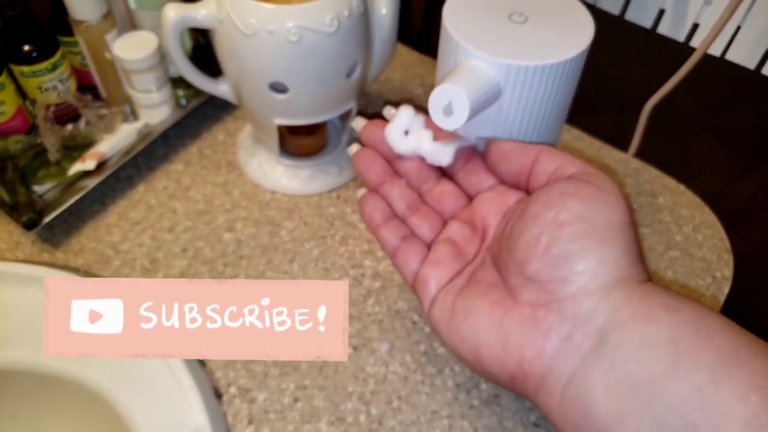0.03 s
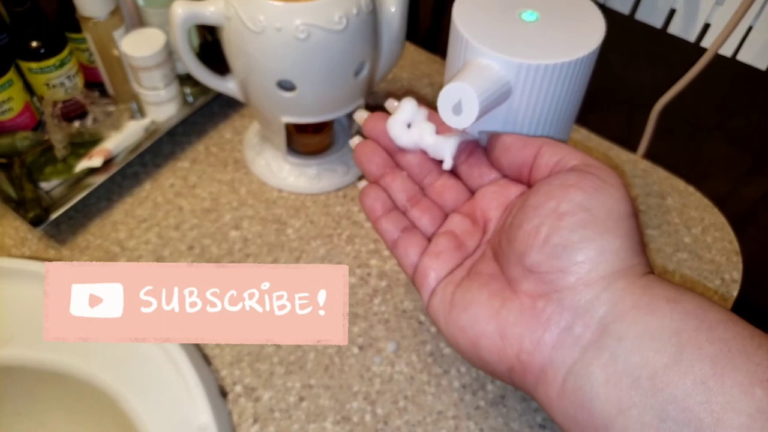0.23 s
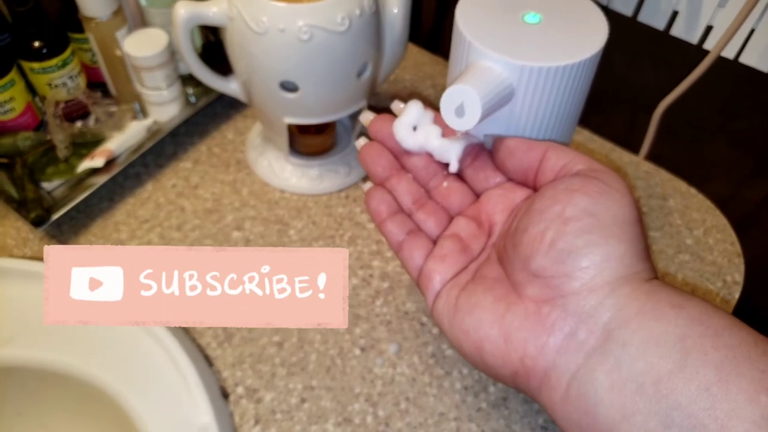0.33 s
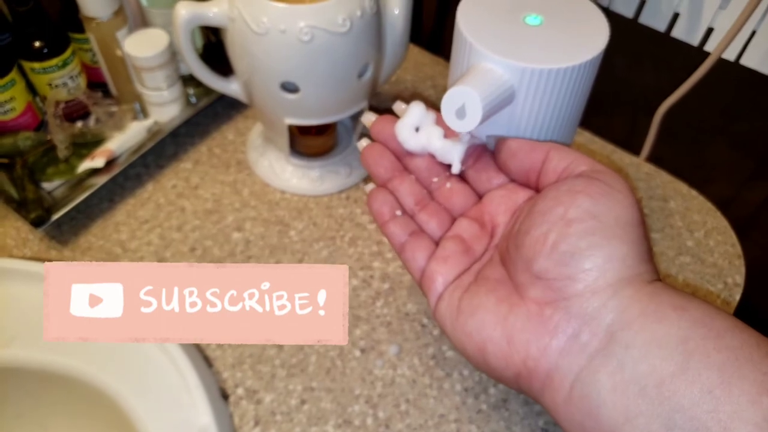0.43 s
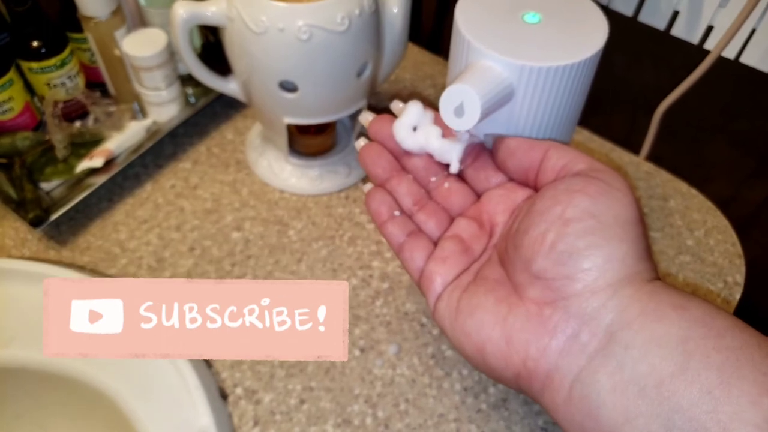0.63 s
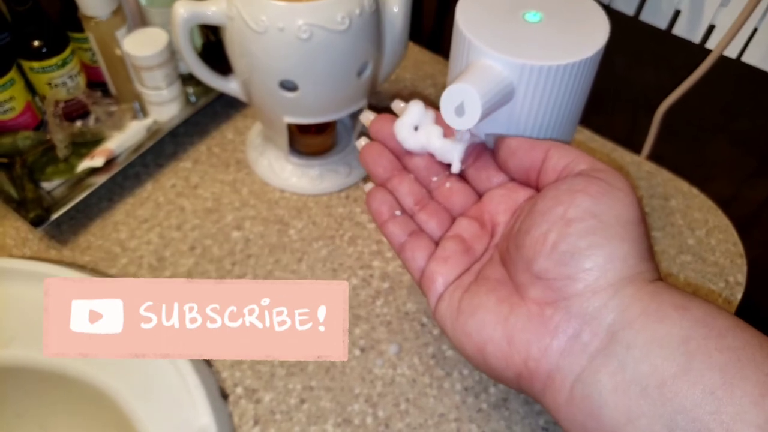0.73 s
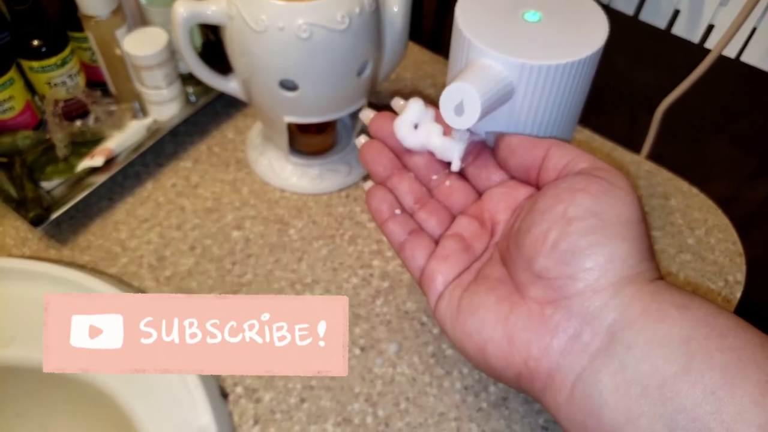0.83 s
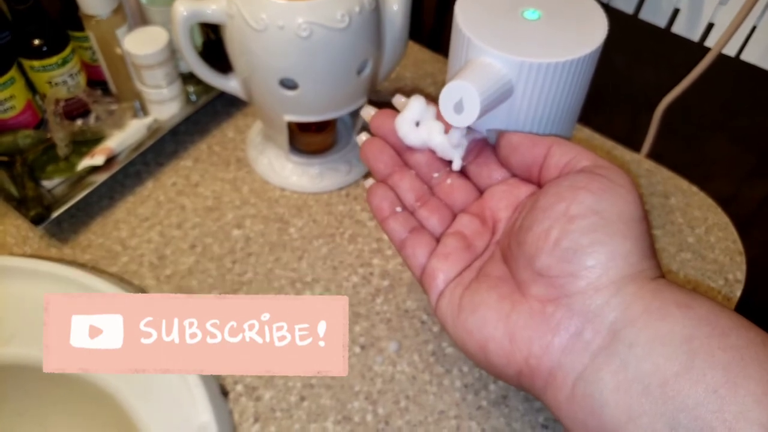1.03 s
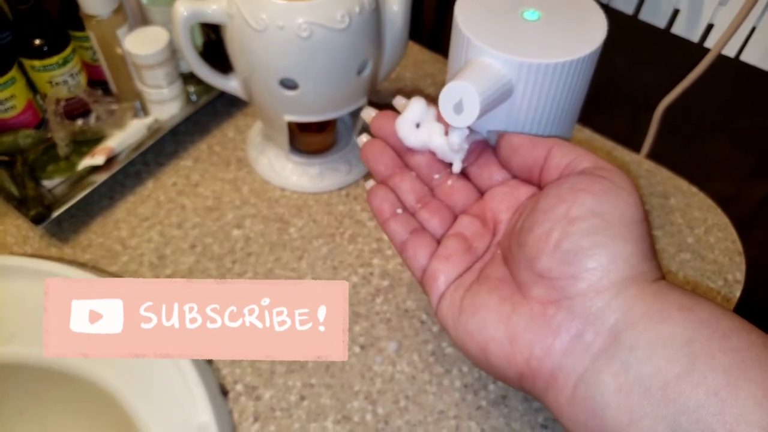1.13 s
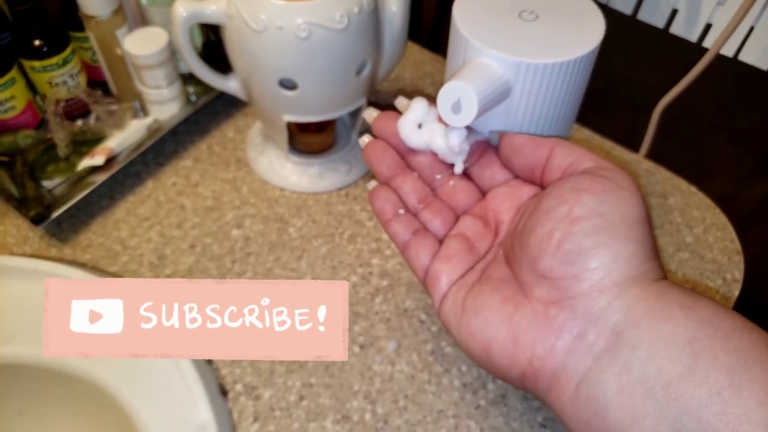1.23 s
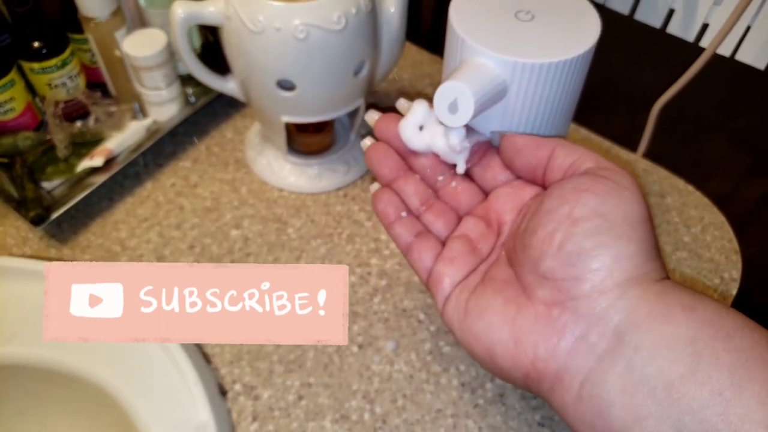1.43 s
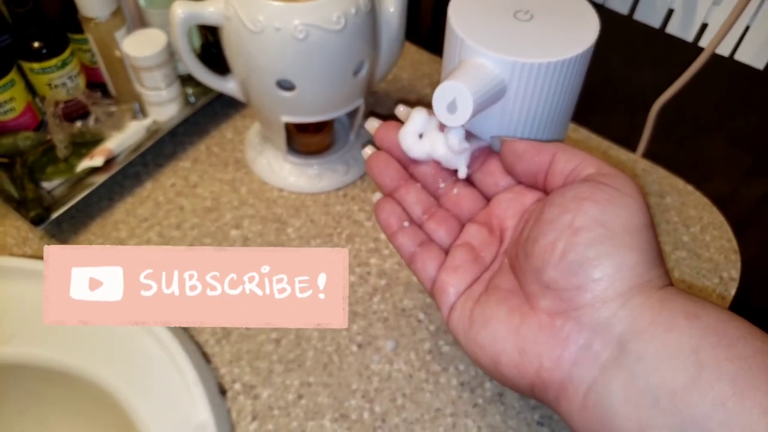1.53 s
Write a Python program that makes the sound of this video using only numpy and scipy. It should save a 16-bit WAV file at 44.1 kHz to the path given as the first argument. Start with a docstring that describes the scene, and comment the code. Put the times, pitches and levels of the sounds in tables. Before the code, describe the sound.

A small automatic soap dispenser starts at about 0.2 seconds, close and toward the left in a quiet bathroom. Its motor quickly rises in pitch, then holds a buzzing whir while foam hisses, crackles and spits unevenly from the nozzle. Motor and foam stop around 1.3 seconds. A very faint high squeak and thin tick follow near 1.5 seconds. Low electrical hum and soft room noise lie underneath throughout.

```python
"""On a bathroom counter, a small automatic soap dispenser runs for a second near the left microphone.
Its motor spins up and drives an air pump whose strokes hum and tick in the plastic housing.
Foam hisses, crackles and spits out of the nozzle with each stroke. Mains hum and quiet room noise
lie underneath, and a faint squeak and tick follow once the pump has stopped."""
import sys
import numpy as np
from scipy import signal
from scipy.fft import rfft, irfft, next_fast_len
from scipy.io import wavfile
from scipy.ndimage import map_coordinates

SR = 44100
rng = np.random.default_rng(int(sys.argv[2]) if len(sys.argv) > 2 else 0)


def store_wav(level_fs):
    """Save 16-bit WAV to argv[1]."""
    pcm = np.round(np.clip(np.atleast_2d(level_fs), -1, 1) * 32767)
    wavfile.write(sys.argv[1], SR, pcm.T.astype(np.int16))


N = 70560

# the two tones of the mains hum: f/Hz, level/dB
HUM_TONES = [(59.6, -51), (119.6, -52.5)]
# slow beating near 120 Hz as the pump's lowest tone meets the mains hum,
# drawn as a gain on the hum's upper tone: t/s, level/dB
BEATING = [(.25, 7), (.35, -2), (.52, 0.5), (.76, 7.5), (1.5, 5)]
# colour (strength of lows and highs) of the room noise: f/Hz, level/dB
ROOM_COLOUR = [(25, -6), (55, 11.5), (190, -20.5), (310, -1.5), (420, -18.5), (800, -29), (1800, -33),
               (3200, -55)]
# loudness of the faint hiss: t/s, level/dB
FAINT_LEVEL = [(0, -95), (1.3, -57), (1.46, -73.5), (1.52, -66.5)]
# its colour: f/Hz, level/dB
FAINT_COLOUR = [(3000, -4), (6000, 2), (8400, -7.5), (9400, 0.5), (16000, -9)]
# pump strokes per second: t/s, f/Hz
PUMP_SPEED = [(.2, 70), (.25, 98.7), (.298, 111.5), (.358, 119), (.458, 119.5), (.88, 116.8), (1.2, 116.5),
              (1.26, 113), (1.35, 70)]
# loudness of the pump's whirr: t/s, level/dB
WHIRR_LEVEL = [(.2, -75), (.285, -46.5), (.298, -37), (.325, -37.5), (.36, -44.5), (.45, -49), (.6, -45),
               (.65, -40), (1.245, -40), (1.275, -77)]
# loudness of the motor's drone and ticking: t/s, level/dB
MOTOR_LEVEL = [(.19, -105), (.215, -54.5), (.27, -42.5), (.45, -42.5), (.8, -39), (1.23, -42.5), (1.3, -52),
               (1.38, -120)]
# tones of the drone: multiple of the pump speed, level/dB
DRONE_TONES = [(1, -9), (2, -13), (3, -12), (5, -9), (6, -11), (12, -3)]
# colour of the valve ticks: f/Hz, level/dB
VALVE_COLOUR = [(300, -40), (800, -16), (1400, 0), (3500, -5), (5000, -12), (7500, -11), (12000, -40)]
# pitches the plastic housing boosts or swallows: f/Hz, width/Hz, level/dB
HOUSING_RESONANCES = [(750, 50, -14.5), (1823, 47, 3.5), (2412, 32, 5.5), (2630, 100, -5.5),
                      (4006, 190, -8), (4480, 166, -15), (4725, 110, 6.5), (3045, 29, 2)]
# flow of foam through the nozzle: t/s, level/dB
FOAM_FLOW = [(.19, -81), (.205, -54), (.25, -33.5), (.3, -33.5), (.38, -30), (.46, -31.5), (.49, -33),
             (.6, -32.5), (.67, -29), (.75, -31.5), (.87, -31.5), (.95, -28), (1, -32.5), (1.06, -29.5),
             (1.24, -30.5), (1.3, -42.5), (1.38, -74.5)]
# colour of the foam: f/Hz, level/dB
FOAM_COLOUR = [(100, -14), (300, -19), (750, -11), (1000, -10), (1350, -2.5), (2200, 0.5), (3500, -2.5),
               (5800, -9.5), (6700, -7), (8200, -12), (9700, -16), (10400, -22), (16000, -32)]
# loudness of the fine fizz: t/s, level/dB
FIZZ_LEVEL = [(.2, -76), (.255, -45.5), (.39, -43), (.5, -50.5), (.85, -48), (.93, -42.5), (1.24, -47),
              (1.34, -78)]
# larger pockets of air sputtering out: t/s, level/dB, extra treble/dB, length/s
AIR_POCKETS = [(0.2207, -28, -3.5, 0.004), (0.272, -19, -16, .006), (0.295, -20, 3, 0.0023),
               (0.311, -19, 6, 0.0037), (0.343, -16, 2, 0.0058), (0.357, -18, 6.5, .006),
               (0.385, -15.5, -6, 0.0084), (0.3936, -10, 1.5, 0.0026), (0.4033, -12, -4.5, 0.0027),
               (0.4375, -12, -14, 0.0056), (0.4457, -14.5, 5, 0.0047), (0.463, -10, 0.5, 0.0012),
               (0.506, -13, 1, 0.0023), (.5295, -15, 3.5, .003), (0.585, -21.5, 11.5, 0.0025),
               (0.644, -19, 6, 0.0055), (0.673, -18, 6, 0.0044), (0.686, -17, 7, 0.0018),
               (.714, -15.5, 2, 0.0048), (0.807, -16.5, 8, 0.0015), (.8875, -27, 5, 0.0009),
               (.92, -21.5, 8.5, 0.015), (0.953, -16.5, 3.5, 0.0087), (.979, -5.5, 0, 0.0014),
               (1.0192, -15.5, 5.5, 0.0071), (1.043, -15, 1, 0.0025), (1.095, -20, 6.5, 0.0095),
               (1.141, -17, 5, 0.0065), (1.224, -20, 0, 0.014), (1.251, -18.5, 3, 0.0097),
               (1.307, -19.5, -18, 0.0068), (1.3245, -25, -12, 0.0097)]
# path of the squeak: t/s, f/Hz, level/dB
SQUEAK_PATH = [(1.43, 6060, -91), (1.5, 6600, -65), (1.53, 6630, -59), (1.58, 6350, -98)]
# colour of the last tick: f/Hz, level/dB
TICK_COLOUR = [(1000, -46), (5000, -8), (11000, -0.5)]
# how alike the foam is at the two microphones: f/Hz, likeness from 0 to 1
LIKENESS = [(300, 0.8), (900, 0.3), (2000, 0.4), (5000, .42), (9500, 0.3), (12000, 0.5)]
# how far the wave on the left is ahead: f/Hz, phase/rad
LEFT_LEAD = [(360, 0.25), (468, -1.05), (585, 1.9), (1100, 0.37), (2000, 0.11), (3500, -1.2), (6400, 1.9),
             (8100, -1)]
# how much louder the dispenser is on the left: f/Hz, level/dB
LEFT_BOOST = [(100, 6), (650, 1), (1400, 11), (2400, 15), (4200, 10), (4900, 13.5), (6600, 17),
              (8000, 14.5), (9300, 1), (12000, -4.5)]


def amp(db):
    """Turn decibels into a number to multiply by."""
    return 10 ** (np.asarray(db) / 20)


def unit(x):
    """Scale x to an average power of 1."""
    return x / np.sqrt(np.mean(x ** 2) + 1e-20)


def along(points, hz):
    """Read between (f/Hz, value) points, giving each octave about equal room."""
    f, values = np.transpose(points)
    return np.interp(np.log(hz + 1), np.log(f + 1), values)


def curve(rows):
    """Join (t/s, value) points with straight lines, one value per sample."""
    return np.interp(np.arange(N) / SR, *np.transpose(rows))


def wobble(rate):
    """A smooth curve through `rate` random values a second."""
    return map_coordinates(rng.standard_normal(N // 8), [np.arange(N) * rate / SR])


def filtered(x, response):
    """Multiply each frequency in x by response(hz); complex values also shift its phase."""
    size = next_fast_len(N + SR // 2)
    return irfft(rfft(x, size) * response(np.fft.rfftfreq(size, 1 / SR)), size)[..., :N]


def coloured(x, level):
    """Turn each frequency in x up or down by level(hz) decibels."""
    size = 2 * next_fast_len(N)
    cepstrum = irfft(np.log(amp(level(np.fft.rfftfreq(size, 1 / SR)))), size)
    # fold it so the filter rings only after a sound, never before
    cepstrum[..., 1:size // 2] *= 2
    cepstrum[..., size // 2 + 1:] = 0
    return irfft(rfft(x, size) * np.exp(rfft(cepstrum)), size)[..., :N]


def shaped(x, colour):
    """Give x a colour from a table, at an average power of 1."""
    return unit(coloured(x, lambda hz: along(colour, hz)))


def brightened(x, treble_db, above_hz=4500):
    """Turn the treble of x up or down."""
    low = signal.sosfiltfilt(signal.butter(2, above_hz, fs=SR, output="sos"), x)
    return low + amp(treble_db) * (x - low)


def background(room_db=-61.5, rise_db_per_s=5.5, left_extra_db=4.5):
    """Mains hum with a drawn-in slow beat against the pump, rising low room noise and a faint hiss."""
    t = np.arange(N) / SR
    low, high = [np.sqrt(2) * amp(db + 0.2 * wobble(20)) * np.sin(2 * np.pi * (hz * t + rng.random()))
                 for hz, db in HUM_TONES]
    hum = low + amp(curve(BEATING)) * high
    noise = rng.standard_normal(N) + 0.13 * rng.standard_normal((2, N))  # nearly the same on both sides
    room = amp(room_db + rise_db_per_s * t) * shaped(noise, ROOM_COLOUR)
    hiss = amp(curve(FAINT_LEVEL)) * shaped(rng.standard_normal((2, N)), FAINT_COLOUR)
    return (hum + room) * amp(left_extra_db * np.array([[.5], [-.5]])) + hiss


def housing(x, colour):
    """Colour x and let it ring in the plastic housing; white noise would keep its power."""
    def level(hz):
        ringing = sum(db / (1 + (2 * (hz - centre) / width) ** 2)
                      for centre, width, db in HOUSING_RESONANCES)
        return along(colour, hz) + ringing
    power_gain = np.mean(amp(level(np.linspace(0, SR / 2, N))) ** 2)
    return coloured(x, level) / np.sqrt(power_gain)


def motor(strokes, ticking_db=-1.5):
    """The motor drones and whirrs at multiples of the pump speed; a valve ticks on every stroke."""
    def tone(multiple, waver_db, drift):
        phase = 2 * np.pi * (multiple * strokes + rng.random()) + drift * wobble(24)
        return np.sqrt(2) * np.sin(phase) * amp(waver_db * wobble(40.19))
    drone = sum(amp(db) * tone(multiple, waver_db=2.6, drift=0.29) for multiple, db in DRONE_TONES)
    whirr = amp(curve(WHIRR_LEVEL)) * tone(multiple=4, waver_db=1.8, drift=0.15)
    clicks = np.diff(np.floor(strokes + .006 * wobble(120)), prepend=0)  # slightly uneven in time
    clicks *= amp(2 * wobble(120))  # and in strength
    ticking = amp(ticking_db) * housing(unit(clicks), VALVE_COLOUR)
    return whirr + amp(curve(MOTOR_LEVEL)) * (drone + ticking)


def foam(strokes):
    """Air hisses through the mesh, tiny bubbles burst and each stroke spits; two unrelated rows."""
    hiss_db, crackle_db, spit_db = -2, -4, -5
    bubbles_per_s, bubble_spread_db, flutter_db = 2400, 4, 1.62
    spit_decay_s, spit_spread_db = .0018, 3.5
    sizes = amp(bubble_spread_db * np.minimum(rng.exponential(size=N), np.pi))
    signs = rng.choice([-1, 1], (2, N))
    bubbles = unit(sizes * signs * (rng.random(N) < bubbles_per_s / SR))
    flutter = amp(flutter_db * wobble(130))
    rush = flutter * (amp(hiss_db) * rng.standard_normal((2, N)) + amp(crackle_db) * bubbles)

    # each stroke's spit has its own small delay and strength
    stroke = strokes.astype(int)
    age = (strokes - stroke) / curve(PUMP_SPEED) - spit_decay_s * rng.random(N)[stroke]
    strength = amp(spit_spread_db * np.minimum(rng.standard_normal(N), 1))[stroke]
    envelope = strength * (age > 0) * np.exp(-np.abs(age) / spit_decay_s)
    spits = brightened(unit(envelope * rng.standard_normal((2, N))), treble_db=3.5)

    flow_db = curve(FOAM_FLOW)
    nozzle = amp(flow_db) * (rush + amp(spit_db) * spits)
    treble_db = 0.53 * (flow_db + 29.5)  # more flow sounds brighter
    return housing(brightened(nozzle, treble_db), FOAM_COLOUR)


def fizz(above_hz=9700):
    """The finest bubbles make an even sizzle above the rest of the foam."""
    only_highs = signal.butter(3, above_hz, "highpass", fs=SR, output="sos")
    return amp(curve(FIZZ_LEVEL)) * unit(signal.sosfilt(only_highs, rng.laplace(size=(2, N))))


def sputters(gain_db=-7.5, rise_s=0.0003):
    """Each pocket of air breaks out as a short spit of its own brightness; two unrelated rows."""
    out = np.zeros((2, N))
    age = np.arange(SR // 20) / SR
    for start, db, treble_db, length in AIR_POCKETS:
        envelope = amp(db + gain_db) * (1 - np.exp(-age / rise_s)) * np.exp(-(age / length) ** 2)
        burst = envelope * rng.standard_normal((2, len(age)))
        out[:, round(start * SR):][:, :len(age)] += brightened(burst, treble_db)
    return housing(out, FOAM_COLOUR)


def squeak():
    """A very faint, unsteady whistle on the left rises, then sags as it fades."""
    path = np.array(SQUEAK_PATH)
    hz, db = curve(path[:, :2]), curve(path[:, ::2])
    t = np.arange(N) / SR
    phase = 2 * np.pi * np.cumsum(hz) / SR + wobble(400)
    sounding = (t > path[0, 0]) & (t < path[-1, 0])
    return np.array([[1], [0]]) * sounding * amp(db) * np.sin(phase)


def tick(start_s=1.4995, level_db=-48.5, fade_s=0.059):
    """A faint, thin tick: a burst of high noise that drops 60 dB in fade_s."""
    age = np.arange(N) / SR - start_s
    envelope = amp(level_db - 60 * np.abs(age) / fade_s) * (age > 0)
    return envelope * shaped(rng.standard_normal((2, N)), TICK_COLOUR)


def bathroom(x, echo_db=-12, fade_s=.22):
    """The tiles add a short echo with little bass."""
    _, t, spectra = signal.stft(rng.standard_normal((2, SR // 2)), SR, nperseg=256)
    tail = signal.istft(spectra * amp(-60 * t / fade_s), SR, nperseg=256)[1]
    tail /= np.linalg.norm(tail, axis=1, keepdims=True)
    echoes = signal.fftconvolve(x, tail, axes=1)[:, :N]
    no_bass = signal.butter(4, 800, "highpass", fs=SR, output="sos")
    return x + amp(echo_db) * signal.sosfilt(no_bass, echoes)


def scene():
    """The left microphone hears the dispenser directly; the shaded right, weaker and partly scattered."""
    strokes = np.cumsum(curve(PUMP_SPEED)) / SR  # running count of pump strokes
    pump = motor(strokes)
    direct, scattered = foam(strokes) + sputters()
    shared = filtered(direct, lambda hz: along(LIKENESS, hz))
    unshared = filtered(scattered, lambda hz: np.sqrt(1 - along(LIKENESS, hz) ** 2))
    right = filtered(pump + shared + unshared, lambda hz: np.exp(-1j * along(LEFT_LEAD, hz)))
    in_room = bathroom(np.array([pump + direct, right]))
    balance = lambda hz: np.sqrt(2 / (1 + amp(along(LEFT_BOOST, hz) * np.array([[-1], [1]])) ** 2))
    return filtered(in_room, balance) + fizz() + tick() + squeak() + background()


def record(dry, top_hz=15950):
    """Soften both ends and cut everything above top_hz."""
    fade = signal.windows.tukey(N, .006)
    return filtered(dry * fade, lambda hz: hz < top_hz)


dry = scene()
out = record(dry)
store_wav(out)
```